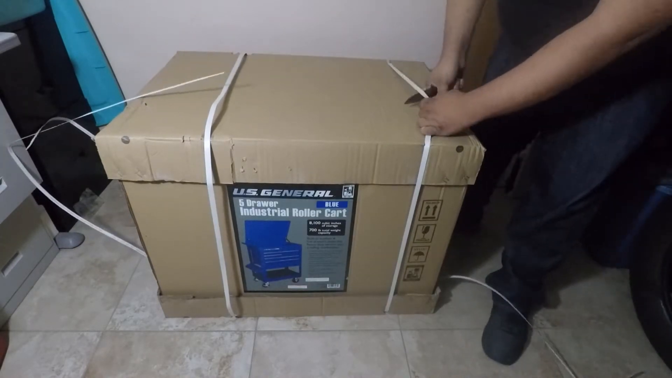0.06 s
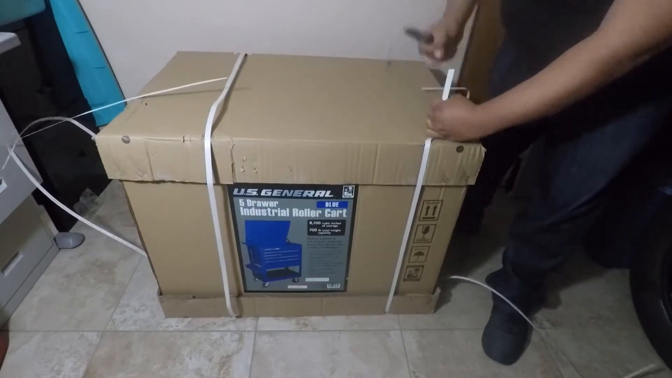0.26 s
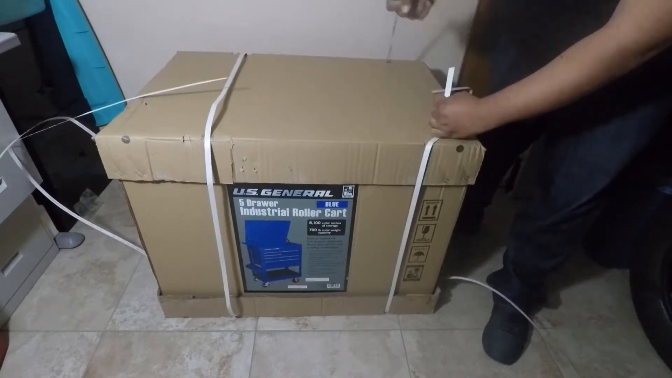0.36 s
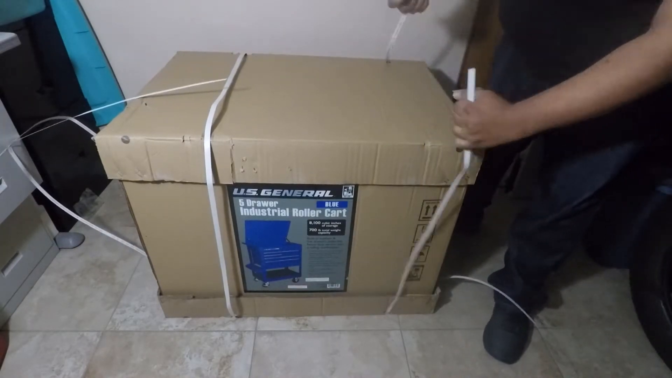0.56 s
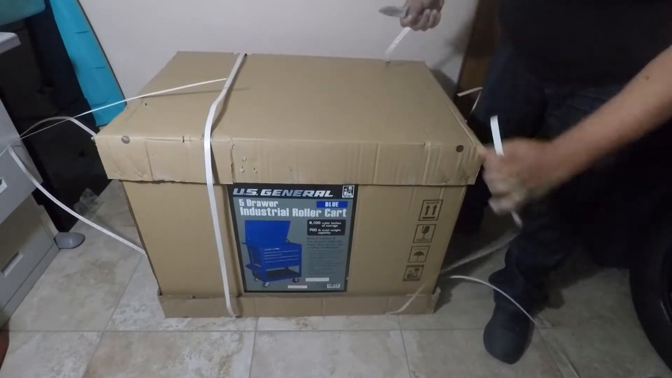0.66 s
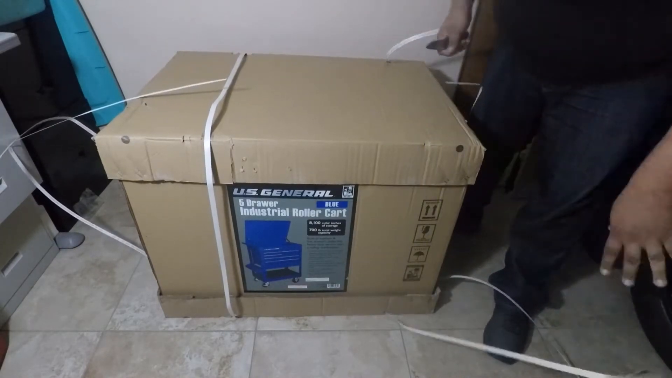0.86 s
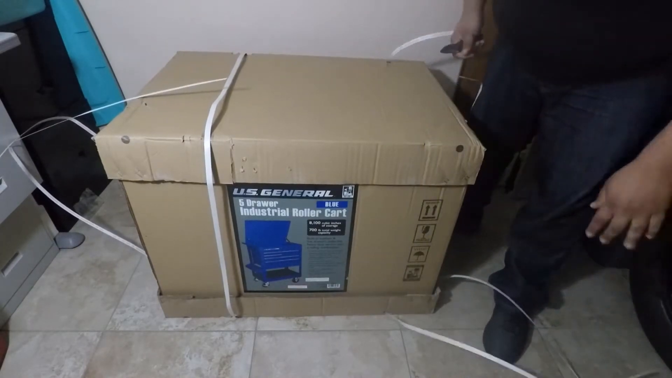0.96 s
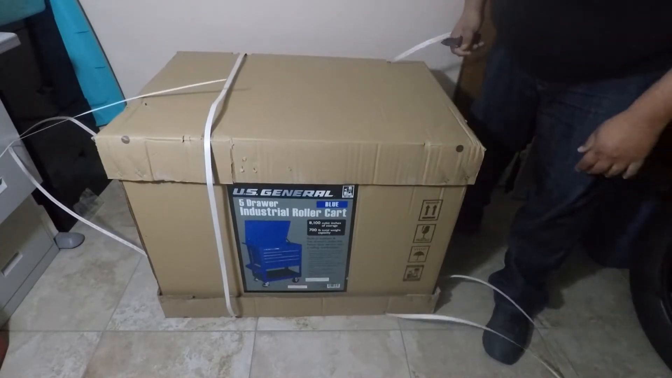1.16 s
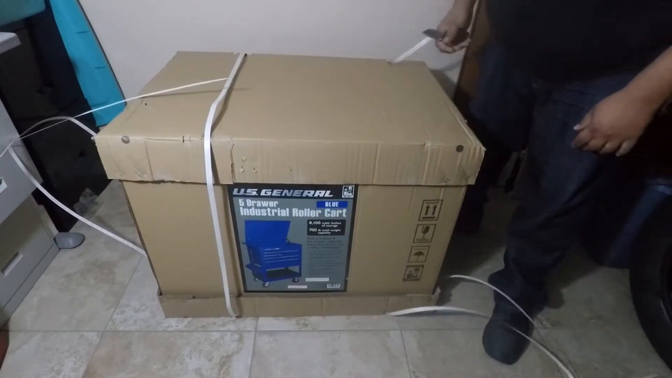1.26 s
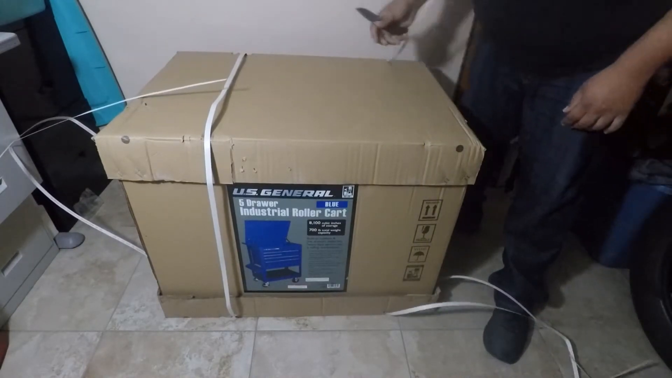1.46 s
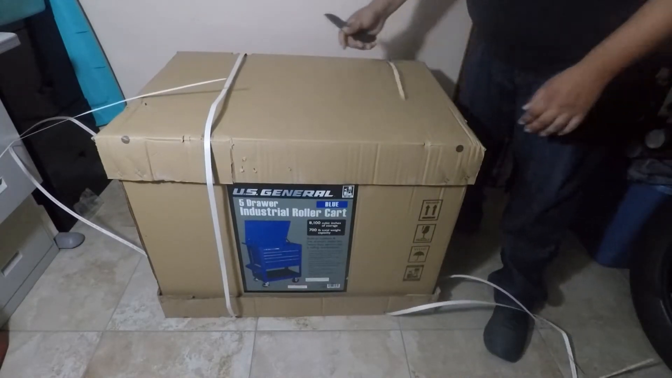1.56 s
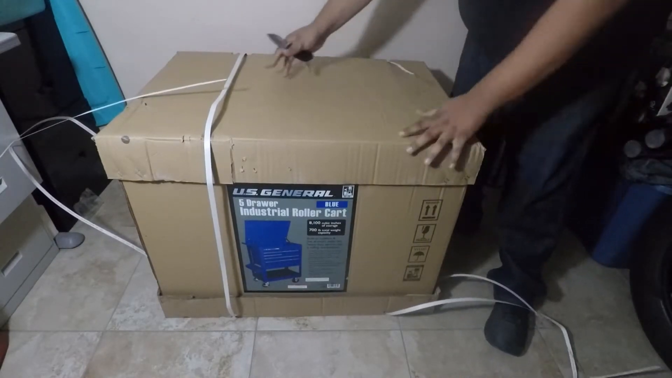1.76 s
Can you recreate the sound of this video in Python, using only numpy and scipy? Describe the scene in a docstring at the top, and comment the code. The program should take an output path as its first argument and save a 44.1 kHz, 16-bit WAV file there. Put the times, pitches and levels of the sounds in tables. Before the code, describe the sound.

Plastic strap cut on a big cardboard box: sharp overloaded snap, boxy thump, then light rustles

```python
"""Faint plastic rustle and a bump on cardboard, then a knife cuts a taut strap on a big box in a tiled room.
Fibres tear, the strap cracks apart (coloured noise bursts), and the lid booms and rings the box's modes.
The loose ends whip against the box (bursts), slide (grains and noise), zip over a corner and tap down (resonances).
A strap end flicks off the blade with a bright ping, plastic rustles, and a hand lands on the lid.
All over a steady noise floor; every source but the floor and the box's modes also feeds the room."""
import sys
import numpy as np
from scipy import signal
from scipy.fft import rfft, irfft
from scipy.io import wavfile

SR = 44100
rng = np.random.default_rng(int(sys.argv[2]) if len(sys.argv) > 2 else 0)


def store_wav(level_fs):
    """Save 16-bit WAV to argv[1]."""
    pcm = np.round(np.clip(np.atleast_2d(level_fs), -1, 1) * 32767)
    wavfile.write(sys.argv[1], SR, pcm.T.astype(np.int16))


N = 79380

# Steady background. Each row: frequency in Hz, gain in dB.
FLOOR_COLOUR = [(20, -38), (60, -49.5), (120, -55), (280, -52.5), (600, -60), (1400, -60), (2500, -65.5),
                (7000, -68.5), (11000, -73), (15000, -71.5)]
# Room reverberation. Each row: frequency in Hz, time to fall 60 dB in seconds.
ROOM_T60_S = [(60, .5), (150, .27), (350, 0.37), (1000, 0.3), (3000, 0.36), (8000, 0.34), (14000, .29)]
# Modes of the box. Each row: frequency in Hz, relative level in dB, time to fall 60 dB in seconds.
BOX_MODES = [(58, -17, .5), (96, -3, .27), (159, -1, .21), (260, 0, .27), (307, -4, .3), (349, -5, .28),
             (478, -5, .28), (517, -11, .34), (637, -11, .3), (736, -8, .33), (780, -6, .3), (870, -7, .36),
             (1075, -7, .31), (1437, -9, .33)]
# Pitched bumps and scuffs on cardboard. Each row: start in seconds, frequency in Hz, gain in dB, decay in seconds.
NUDGES = [(.148, 308, -30, 0.015), (.453, 899, -25, 0.0088), (.499, 683, -23, 0.0063),
          (.561, 626, -27.5, 0.0066), (1.220, 1630, -37, 0.011), (1.530, 2000, -36.5, .009),
          (1.613, 570, -26.5, .012), (1.652, 494, -25, 0.017)]
# Level of the sliding strap's friction before colouring. Each row: time in seconds, relative level in dB.
RUSTLE_LEVEL = [(0, -54.5), (.09, -65.5), (.16, -52.5), (.22, -54), (.47, -51.5), (.503, -40), (.555, -64),
                (.7, -72.5), (.95, -76.5), (1.01, -58), (1.16, -86.5), (1.25, -59.5), (1.35, -59),
                (1.44, -60.5), (1.58, -61.5), (1.68, -58.5), (1.8, -64.5)]
# Colour of the rustle. Each row: frequency in Hz, gain in dB.
RUSTLE_COLOUR = [(80, -4), (300, 7), (800, 3), (1200, -0.5), (1450, 6.5), (1800, -4), (4000, -5),
                 (5500, -6), (8000, -2.5), (11000, -10.5), (15000, -12)]
# Resonances of the strap end tapping down. Each row: frequency in Hz, width per filter pass in Hz, gain in dB.
TAP_RESONANCES = [(590, 320, -17), (1096, 110, -23), (2190, 660, -24)]
# Pitches at which a contact's gain is set, in Hz.
CONTACT_HZ = [130, 650, 2200, 7000, 14000]
# Strap ends and hands striking cardboard. Each row: start in seconds, decay in seconds,
# gain in dB at each of the five contact pitches, box ring in dB, room send in dB.
CONTACTS = [ (.0130, 0.006, -40, -53.5, -50, -46.5, -68, -68.5, -5),
            (.2413, 0.0021, 9, -8, -10, -21, -21.5, -45.5, -1.5),
            (0.2502, 0.0039, -16, -10, -30, -14.5, -22.5, -44, -5),
            (0.3158, 0.0078, -21, -6.5, -16, -18.5, -32, -42, -6),
            (0.6145, 0.0037, -24, -31.5, -40.5, -38, -46.5, -50.5, -2),
            (0.742, 0.0048, -50, -58, -56, -50, -68, -68.5, -1.5),
            (1.0176, 0.0046, -42, -27, -27.5, -40, -55, -58, 2.5),
            (1.2197, .003, -55, -42.5, -43.5, -42, -53, -75, 2.5),
            (1.2920, 0.0034, -53, -55, -50.5, -47, -57, -81, 5),
            (1.3310, 0.0065, -57.5, -45.5, -43.5, -43.5, -56, -79, -5),
            (1.4500, .003, -57.5, -53.5, -43, -51, -66, -75, -10.5),
            (1.4910, 0.0024, -61.5, -51, -59, -41, -76, -75, -8),
            (1.5280, .010, -55, -42, -44.5, -65.5, -70, -64.5, -2.5),
            (1.6059, 0.0012, -43.5, -20, -32, -19, -31, -63, -6),
            (1.6090, 0.0012, -49, -26.5, -29, -22, -42, -61, -25),
            (1.6150, 0.044, -33.5, -34.5, -43, -45.5, -53, -58, -6),
            (1.6365, 0.0025, -45, -24.5, -37, -41, -47, -62.5, 2.5),
            (1.6460, 0.0015, -36, -28, -38, -30, -34, -61.5, -14),
            (1.7160, 0.019, -61.5, -44.5, -47, -59, -64, -89, 2.5),
            (1.7935, 0.012, -15, -37, -47.5, -47, -55, -47.5, -23)]
# Two bursts, at one moment, of the flick off the blade. Each row: start in seconds, relative level in dB.
FLICKS = [(1.024, 2.5), (1.024, -2)]
# Colour of the ping. Each row: frequency in Hz, gain in dB.
PING_COLOUR = [(150, -25), (900, -19), (2500, -14), (4200, -7.5), (5900, -16), (6900, -5), (7600, 3.5),
               (8050, -1.5), (8550, -0.5), (9400, -7.5), (10200, -28), (13500, -20.5), (15500, -27)]
# Colour of the lid's boom. Each row: frequency in Hz, gain in dB.
BOOM_COLOUR = [(20, -24), (45, -7), (75, 0), (135, 8.5), (200, 2), (300, -1), (600, -4.5), (1500, -23.5),
               (5000, -50)]
# Colour of the tear and crack. Each row: frequency in Hz, gain in dB.
CRACK_COLOUR = [(40, -12.5), (150, -5), (400, 0.5), (800, 2), (1250, 2), (1900, -3.5), (2700, -2.5),
                (3900, -3.5), (4700, -12.5), (5800, -7), (8000, -9.5), (11500, -22), (15000, -17.5)]

FLOOR_GAIN_DB = 1.5
ROOM_GAP_S, ROOM_BUILD_S, ROOM_TREBLE_DB = 0.001, .003, -3
NUDGE_WIDTH_HZ = 190  # per filter pass
GRAINS_PER_S, GRAIN_SPREAD_DB, RUB_SHARE = 300, -1, .6
ZIP_S, ZIP_HALF_LENGTH_S, ZIP_HZ, ZIP_WIDTH_HZ, ZIP_GAIN_DB = .535, .013, 4050, 750, -38.5
TAP_S, TAP_DECAY_S = .6150, 0.0044
FLICK_DECAY_S, FLICK_GAIN_DB, FLICK_ROOM_DB = .0012, -15.5, -1.5
TEAR_S, TEAR_DECAY_S, TEAR_GAIN_DB = .2200, 0.015, -33.5
SNAP_S, SNAP_DECAY_S, SNAP_GAIN_DB, SNAP_ROOM_DB = .2236, 0.0078, 4, -3
BOOM_S, BOOM_DECAY_S, BOOM_GAIN_DB, BOOM_ROOM_DB, BOOM_RING_DB = .2295, .024, 3.5, -11, -18.5
DRIVE, CEILING, TOP_HZ = 0.99, .95, 15280


def amp(db):
    """Amplitude factor of a level in dB."""
    return 10 ** (np.asarray(db) / 20)


def since(start_s):
    """Seconds since start, zero before it."""
    return np.maximum(np.arange(N) / SR - start_s, 0)


def on_log(hz, points):
    """Read (Hz, value) points on a log-frequency axis."""
    f, v = np.array(points, float).T
    return np.interp(np.log(np.maximum(hz, 1)), np.log(f), v)


def convolve(x, response):
    """Pass x through an impulse response, cut to the scene's length."""
    return signal.fftconvolve(x, response)[:N]


def delayed(x, start_s):
    """Shift x to its start."""
    return np.concatenate([np.zeros(max(int(start_s * SR), 0)), x])[:N]


def colour(x, points, size=4096):
    """Causal minimum-phase filter with the gain of (Hz, dB) points."""
    gain_db = on_log(np.fft.rfftfreq(size, 1 / SR), points)
    cepstrum = irfft(np.log(amp(gain_db)))
    cepstrum[1:size // 2] *= 2
    cepstrum[size // 2 + 1:] = 0
    return convolve(x, irfft(np.exp(rfft(cepstrum))))


def resonate(x, hz, width_hz):
    """A steep two-pass resonance, gain 1 at its centre."""
    b, a = signal.iirpeak(hz, hz / width_hz, fs=SR)
    return signal.lfilter(b, a, signal.lfilter(b, a, x))


def burst(start_s, decay_s, count=3):
    """A dying noise burst, its energy spread nearly evenly over all pitches."""
    fade = np.exp(-np.arange(N // count) / SR / max(abs(decay_s), 1e-4))
    x = rng.standard_normal(len(fade)) * fade
    for _ in range(count):
        flat = irfft(np.exp(1j * np.angle(rfft(x))), len(fade))
        x = flat * np.sqrt(fade)
    x *= np.sqrt(np.sum(fade ** 2) / np.sum(x ** 2))
    return np.concatenate([np.zeros(max(int(start_s * SR), 0)), x, np.zeros(N)])[:N]


def background():
    """Steady coloured noise."""
    return amp(FLOOR_GAIN_DB) * colour(rng.standard_normal(N), FLOOR_COLOUR)


def room_response(count=9):
    """Dense reflections, unit energy before the treble cut; each band dies at its own rate."""
    t, f = since(0), np.fft.rfftfreq(N, 1 / SR)
    noise, out = rfft(rng.standard_normal(N)), 0
    centres_hz = np.geomspace(60, 15000, count)
    for hz, share in zip(centres_hz, np.eye(count)):
        band = irfft(noise * on_log(f, list(zip(centres_hz, share))), N)
        out = out + band * np.exp(-np.log(1000) * t / on_log(hz, ROOM_T60_S))
    out *= 1 - np.exp(-since(ROOM_GAP_S) / ROOM_BUILD_S)
    unit = out / np.sqrt(np.sum(out ** 2))
    return colour(unit, [(8000, 0.0029), (13000, ROOM_TREBLE_DB)])


def box_ring():
    """Decaying sine modes of the box after a blow, alternating in sign."""
    t, ring = since(0), 0
    for k, (hz, db, t60_s) in enumerate(BOX_MODES):
        decay = np.exp(-np.log(1000) * t / t60_s)
        ring = ring + (-1) ** k * amp(db) * np.sin(2 * np.pi * hz * t) * decay
    return ring


def nudges(room):
    """Hand and strap nudge a cardboard panel; a resonated burst answers at one pitch."""
    sound = 0
    for start_s, hz, db, decay_s in NUDGES:
        sound = sound + amp(db) * resonate(burst(start_s, decay_s), hz, NUDGE_WIDTH_HZ)
    return sound + amp(-4) * convolve(sound, room)


def strap_rustle():
    """The strap rubs and crackles: sparse random grains over smooth noise."""
    struck = rng.random(N) < GRAINS_PER_S / SR
    size = amp(GRAIN_SPREAD_DB * np.minimum(rng.exponential(size=N), 4))
    grains = struck * rng.standard_normal(N) * size
    friction = grains / grains.std() * amp(-2.5) + RUB_SHARE * rng.standard_normal(N)
    level_db = np.interp(since(0), *np.array(RUSTLE_LEVEL).T)
    return colour(friction * amp(level_db), RUSTLE_COLOUR)


def strap_zip():
    """The strap's edge zips over a corner: resonant noise that swells and fades."""
    swell = np.exp(-((since(0) - ZIP_S) / ZIP_HALF_LENGTH_S) ** 2)
    return amp(ZIP_GAIN_DB) * resonate(rng.standard_normal(N), ZIP_HZ, ZIP_WIDTH_HZ) * swell


def strap_tap():
    """The strap end taps down: one burst excites short resonances."""
    touch = burst(TAP_S, TAP_DECAY_S)
    return sum(amp(db) * resonate(touch, hz, width_hz) for hz, width_hz, db in TAP_RESONANCES)


def loose_strap(room):
    """The strap slides and taps down, in the room."""
    sliding = amp(-0.5) * (strap_rustle() + strap_zip())
    tap = strap_tap()
    return sliding + tap + convolve(sliding + amp(-7) * tap, room)


def contacts(room, ring):
    """Slaps, ticks and pats: coloured bursts that each also ring the box."""
    direct, send = 0, 0
    for start_s, decay_s, *gains_db, ring_db, room_db in CONTACTS:
        points = [(30, gains_db[0] - 13.5)] + list(zip(CONTACT_HZ, gains_db))
        hit = colour(burst(start_s, decay_s), points)
        direct = direct + hit + amp(ring_db) * delayed(ring, start_s)
        send = send + amp(room_db) * hit
    return direct + convolve(send, room)


def flick(room):
    """A strap end lets go of the blade: short bursts coloured to a bright ping."""
    bursts = sum(amp(db) * burst(start_s, FLICK_DECAY_S) for start_s, db in FLICKS)
    ping = amp(FLICK_GAIN_DB) * colour(bursts, PING_COLOUR)
    return ping + amp(FLICK_ROOM_DB) * convolve(ping, room)


def snap(room, ring):
    """The last fibres tear, the strap cracks apart, and the released lid springs back and booms."""
    parting = amp(SNAP_GAIN_DB) * burst(SNAP_S, SNAP_DECAY_S)
    tear = amp(TEAR_GAIN_DB) * burst(TEAR_S, TEAR_DECAY_S)
    crack = colour(parting + tear, CRACK_COLOUR)
    boom = amp(BOOM_GAIN_DB) * colour(burst(BOOM_S, BOOM_DECAY_S), BOOM_COLOUR)
    reverb = convolve(amp(SNAP_ROOM_DB) * crack + amp(BOOM_ROOM_DB) * boom, room)
    return crack + boom + reverb + amp(BOOM_RING_DB) * delayed(ring, BOOM_S)


def scene():
    """Sum all sources into one channel."""
    room, ring = room_response(), box_ring()
    strap = nudges(room) + loose_strap(room)
    blows = contacts(room, ring) + flick(room) + snap(room, ring)
    return (background() + strap + blows)[None]


def record(dry):
    """The microphone overloads, rounding loud peaks; a steep low-pass cuts off the top."""
    x = DRIVE * dry / CEILING
    rounded = CEILING * x / (1 + x ** 4) ** .25
    low_pass = signal.ellip(8, .2, 70, TOP_HZ, fs=SR, output="sos")
    return signal.sosfilt(low_pass, rounded)


dry = scene()
out = record(dry)
store_wav(out)
```